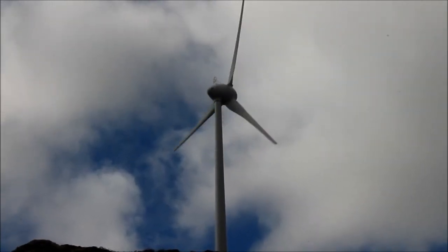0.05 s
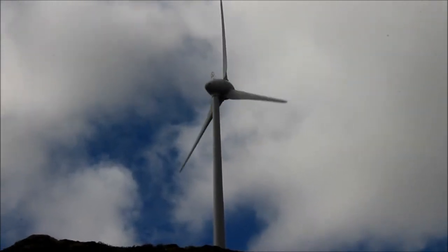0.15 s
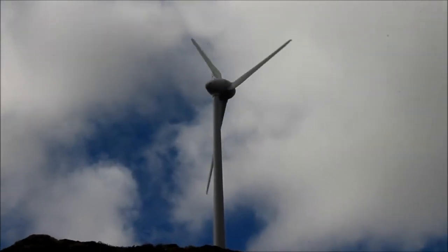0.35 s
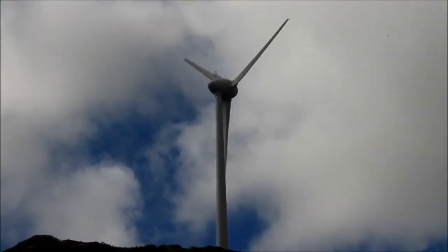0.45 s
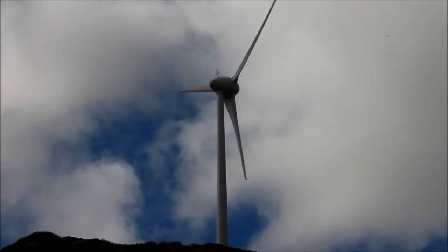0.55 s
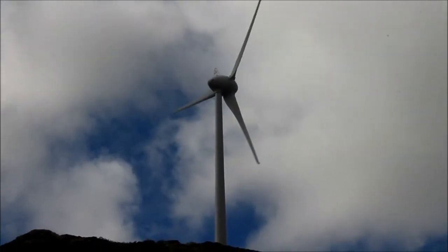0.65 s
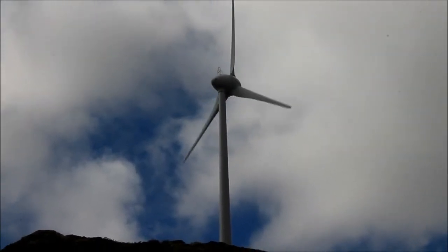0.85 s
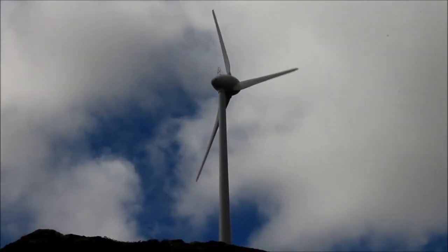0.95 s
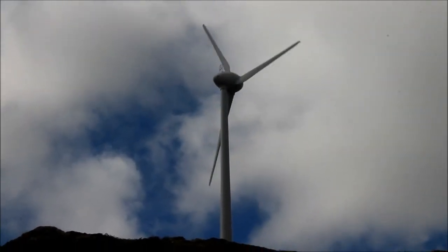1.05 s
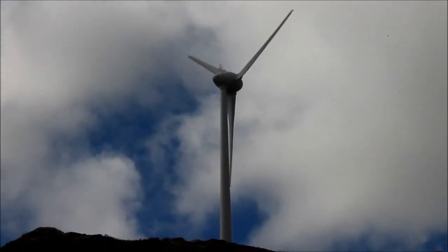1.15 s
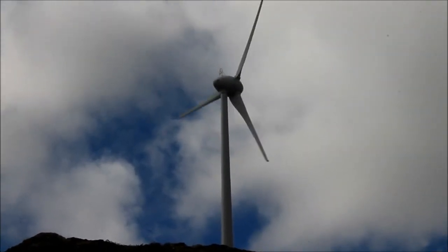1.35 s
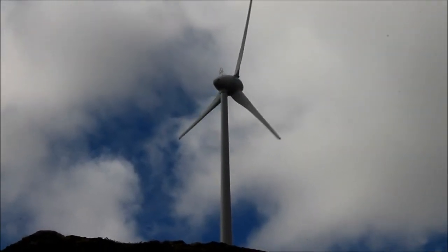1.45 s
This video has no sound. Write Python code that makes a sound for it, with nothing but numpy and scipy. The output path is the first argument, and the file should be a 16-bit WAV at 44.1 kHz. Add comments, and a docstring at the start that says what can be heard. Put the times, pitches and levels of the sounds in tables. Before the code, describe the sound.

Gusts of wind hit an unshielded microphone outdoors, making a low, lumpy rumble with a cluster of distorted thumps early and shorter blows later. A faint hiss from a wind turbine swells and fades in the background.

```python
"""Wind on a bare microphone

Wind buffets a microphone on an open hillside below a wind turbine. Gusts break into eddies
(small whirls of air) that rumble and flutter on it; the hardest blows overload it and crackle.
Behind them is the soft, swelling hiss of the blades and the moving air."""
import sys
import numpy as np
from scipy import signal
from scipy.fft import rfft, irfft
from scipy.io import wavfile
from scipy.ndimage import uniform_filter1d

SR = 44100
rng = np.random.default_rng(int(sys.argv[2]) if len(sys.argv) > 2 else 0)


def materialize(psi):
    """Save the field psi as 16-bit PCM at rate SR to the path in sys.argv[1].

    A 1-D psi becomes a single channel; in a 2-D psi each row is a channel.
    """
    bounded = np.clip(np.atleast_2d(psi).T, -1, 1)
    quanta = np.round(bounded * 32767).astype(np.int16)
    wavfile.write(sys.argv[1], SR, quanta)


N = 66150
TIME = np.arange(N) / SR
FREQS = np.fft.rfftfreq(N, 1 / SR)


def amp(db):
    """Turns decibels into a number to multiply by."""
    return 10 ** (np.asarray(db) / 20)


def unit(x):
    """Scales a signal to an average power of one."""
    return x / np.sqrt(np.mean(x ** 2) + 1e-20)


def curve(points, t):
    """Joins a table's points with straight lines and reads them at times t."""
    return np.interp(t, *np.transpose(points))


def noise(tone):
    """Steady noise; the table says how strong its low and high frequencies are."""
    f, db = np.transpose(tone)
    gain = amp(np.interp(np.log(FREQS + 1), np.log(f), db))
    return unit(irfft(rfft(rng.standard_normal(N)) * gain, N))


def wander(fastest_hz, slowest_hz=1e-3):
    """A smooth random wobble, mostly between two speeds."""
    band = FREQS ** 2 / (FREQS ** 2 + slowest_hz ** 2) / (1 + (FREQS / fastest_hz) ** 4)
    return unit(irfft(rfft(rng.standard_normal(N)) * band, N))


def levelled(x, samples):
    """Keeps the quick lumps of a noise but evens out its slow drift."""
    power = uniform_filter1d(uniform_filter1d(x ** 2, samples), samples)
    return x / np.sqrt(power + 1e-12)


# Tone of the distant hiss: f/Hz, level/dB
HISS_TONE = [(30, 0.5), (200, 2.5), (500, 0.5), (800, 0), (1300, -2.5), (2100, -5.5), (2700, -6),
             (3400, -6.5), (4200, -8.5), (5200, -18.5), (6200, -22.5), (7400, -24.5), (9000, -29.5),
             (12000, -33.5), (16000, -32.5)]
# How the hiss swells and fades: t/s, level/dB
HISS_SWELL = [(0, 1.5), (.08, 1), (.16, 1.5), (.24, -3.5), (.4, -1.5), (.47, 0.5), (.6, -4.5), (.68, -2),
              (.75, -1), (.84, 1), (.99, 1.5), (1.12, -4), (1.32, -4.5), (1.37, 3.5), (1.44, 0.5), (1.5, 0)]

def blade_hiss(level_db=-43, patch_db=0.9, swell_hz=3200, width_octaves=0.76):
    """Far-off blades and moving air hiss softly, swelling most in one band of the treble."""
    hz, t, spectrum = signal.stft(noise(HISS_TONE), SR, nperseg=512, noverlap=384)
    # Blurred random numbers make slightly louder and softer patches in pitch and time.
    speckle = rng.standard_normal(spectrum.shape)
    patches = unit(uniform_filter1d(uniform_filter1d(speckle, 10, axis=0), 16, axis=1))
    octaves_away = np.log2((hz + 1) / swell_hz)
    swell_share = 0.15 + 0.85 * np.exp(-(octaves_away / width_octaves) ** 2)
    swell_db = swell_share[:, None] * curve(HISS_SWELL, t)
    spectrum = spectrum * amp(level_db + swell_db + patch_db * patches)
    return signal.istft(spectrum, SR, nperseg=512, noverlap=384)[1][:N]


# Tone of the deep rumble: f/Hz, level/dB
RUMBLE_TONE = [(10, -27), (25, -15.5), (50, -4.5), (90, 2), (140, 0.5), (250, -38), (600, -75)]
# How loud the rumble is: t/s, level/dB
RUMBLE_LEVEL = [(0, -61), (.05, -40.5), (.09, -33), (.135, -68), (.18, -49.5), (.215, -17.5), (.32, -28),
                (.42, -38), (.46, -18), (.53, -31), (.58, -42.5), (.64, -30.5), (.72, -26.5), (.8, -37),
                (.86, -46), (.98, -41.5), (1.1, -45), (1.19, -41.5), (1.24, -29), (1.33, -53), (1.5, -41)]

def wind_rumble():
    """Swirling air on the microphone makes a deep rumble that comes and goes."""
    return levelled(noise(RUMBLE_TONE), samples=2000) * amp(curve(RUMBLE_LEVEL, TIME))


# Strength of the wind at the microphone: t/s, level/dB
GUST_LEVEL = [(0, -35), (.055, -35.5), (.08, -35), (.135, -28.5), (.155, -41), (.195, -34.5), (.215, -13),
              (.315, -14), (.345, -23), (.39, -11), (.41, -23.5), (.465, -14), (.505, -24), (.55, -35),
              (.6, -34), (.63, -22.5), (.695, -25.5), (.765, -40), (.782, -12.5), (.803, -16.5),
              (.83, -33.5), (.91, -26), (.995, -30.5), (1.015, -17.5), (1.09, -21), (1.12, -26.5),
              (1.15, -26), (1.195, -44.5), (1.215, -25.5), (1.26, -33), (1.335, -45), (1.37, -34.5),
              (1.435, -37.5), (1.475, -29.5), (1.5, -42)]
# Tone of a gust's low roar: f/Hz, level/dB
ROAR_TONE = [(30, -41.5), (80, -16), (140, 3.5), (220, 1), (380, -4.5), (520, -11), (750, -18),
             (1100, -28.5), (1800, -43.5), (4000, -86)]
# Tone of its higher flutter: f/Hz, level/dB
FLUTTER_TONE = [(150, -27), (450, 5), (800, 2.5), (1200, -11.5), (1550, -17.5), (2000, -38), (3000, -44.5),
                (6000, -72)]

def gusts(roar_db=-20, flutter_db=-38, roar_lump_db=7, flutter_lump_db=17.5):
    """A roar and a flutter follow the wind's strength; passing eddies make both lumpy together."""
    gust_db = curve(GUST_LEVEL, TIME) + 22  # zero in a middling gust
    eddies = np.tanh(wander(fastest_hz=75, slowest_hz=7.5))
    roar = levelled(noise(ROAR_TONE) * amp(roar_lump_db * eddies), samples=600)
    flutter = levelled(noise(FLUTTER_TONE) * amp(flutter_lump_db * eddies), samples=1100)
    # The flutter grows faster than the roar, so strong gusts sound brighter.
    return roar * amp(roar_db + gust_db) + flutter * amp(flutter_db + 1.9 * gust_db)


# The hardest single eddies: t/s, level/dB, f/Hz, rise time/s, raggedness/rad
BUFFETS = [(0.064, -14, 240, .002, 0.083), (0.087, -11.5, 178, 0.0025, 0.18),
           (0.1218, -9.5, 268, 0.0017, 0.12), (.1225, -16, 846, 0.001, 0.17),
           (0.209, -9.5, 230, 0.0019, 0.72), (.226, 1, 302, .002, 0.57), (0.245, -6, 514, 0.0018, 0.75),
           (0.267, -0.5, 352, 0.0024, 0.4), (.298, -1, 334, 0.0016, 0.65), (0.3037, 3.5, 247, 0.003, 0.73),
           (0.3106, 4, 256, 0.0018, 0.9), (0.329, 3, 345, .0012, 0.7), (.332, 5.5, 393, 0.00118, 0.41),
           (0.391, -3, 290, 0.0031, .2), (0.424, 1, 375, 0.0024, 0.22), (0.447, -9, 328, 0.0024, 0.22),
           (0.458, -3.5, 268, 0.0022, 0.09), (0.642, -1.5, 222, 0.0038, 0.12),
           (0.7786, 5, 326.6, .0013, 0.33), (0.789, 1.5, 446, 0.001, .2), (.792, -4, 443, 0.002, 0.17),
           (.802, -17.5, 386, 0.0018, 0.43), (0.885, -15, 650, 0.0014, 0.58),
           (0.953, -4.5, 264, 0.0025, 0.21), (1.009, -4.5, 426, 0.0011, 0.15),
           (1.037, -4.5, 380, 0.002, 0.21), (1.048, -2, 310, 0.0013, 0.34),
           (1.081, -2.5, 396, 0.0021, 0.36), (1.142, -14.5, 456, 0.0016, 0.79),
           (1.227, -23.5, 385, 0.00042, 0.15), (1.469, -14.5, 271, .002, 0.27)]

def buffets(low_cut_hz=140):
    """Each hard eddy shoves the microphone's thin diaphragm through one or two ragged swings."""
    swings = np.zeros(N)
    wobble = wander(fastest_hz=714)
    phases = rng.random(len(BUFFETS))
    for (start, db, hz, rise, raggedness), phase in zip(BUFFETS, phases):
        age = np.maximum(TIME - start, 0)
        push = (age / rise * np.exp(1 - age / rise)) ** 2
        swings += amp(db) * push * np.sin(2 * np.pi * (hz * age + phase) + raggedness * wobble)
    # Cutting the lowest frequencies takes out the steady push.
    low_cut = signal.butter(2, low_cut_hz, "high", fs=SR, output="sos")
    return signal.sosfilt(low_cut, swings)


def scene():
    """Wind on the microphone in front of the distant hiss, in one channel."""
    return (blade_hiss() + wind_rumble() + gusts() + buffets())[None]


def record(dry):
    """The hardest blows overload the input and crackle; then the highest treble is cut."""
    clipped = np.clip(dry, -1, 1)
    treble_cut = signal.firwin(511, cutoff=16100, window=("kaiser", 9), fs=SR)
    return signal.oaconvolve(clipped, treble_cut[None], "same")


dry = scene()
out = record(dry)
materialize(out)
```